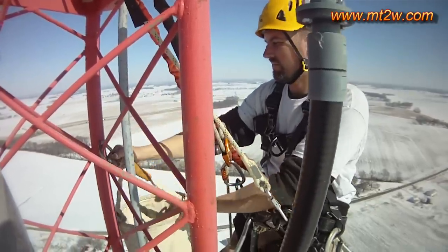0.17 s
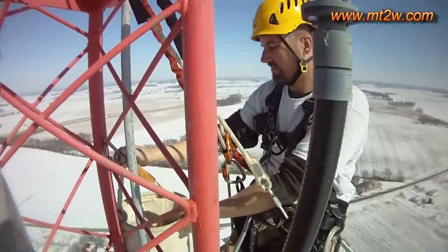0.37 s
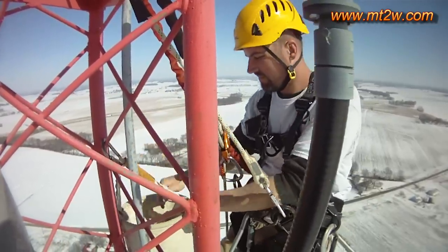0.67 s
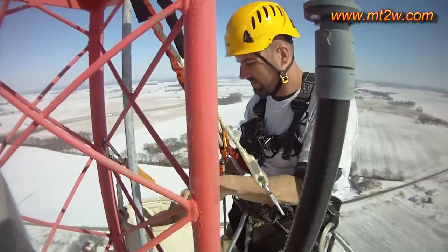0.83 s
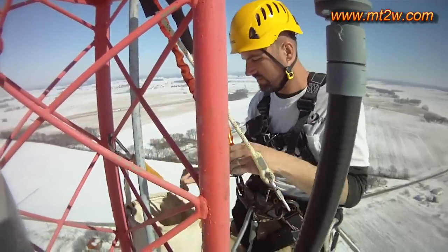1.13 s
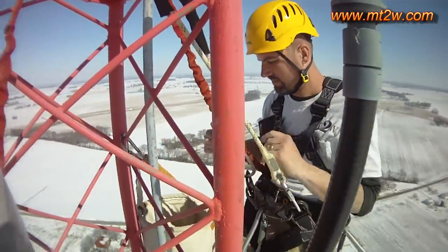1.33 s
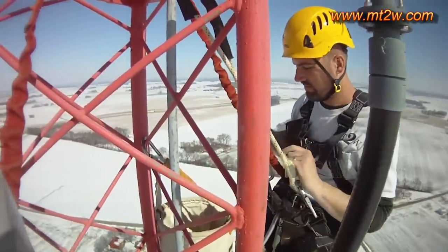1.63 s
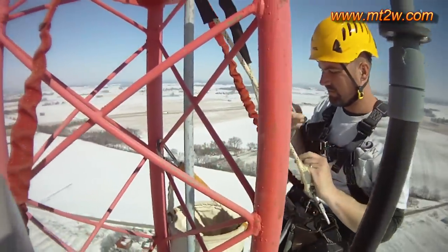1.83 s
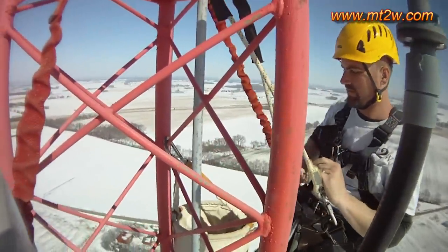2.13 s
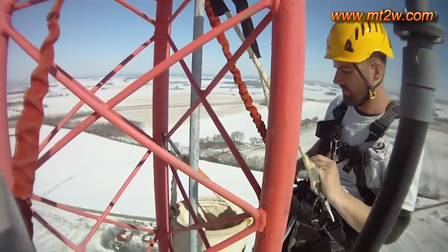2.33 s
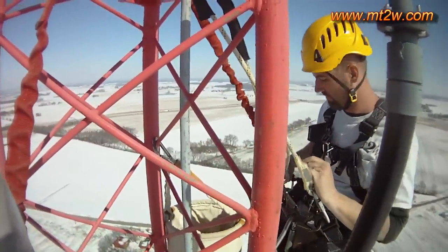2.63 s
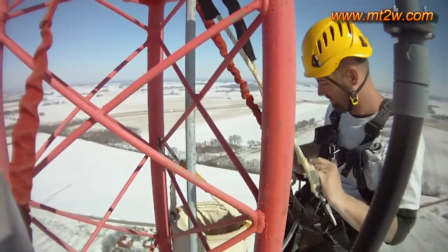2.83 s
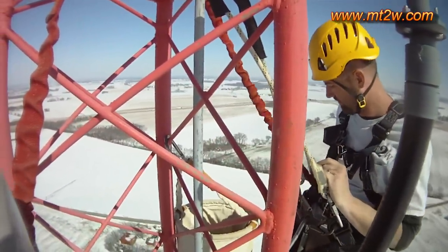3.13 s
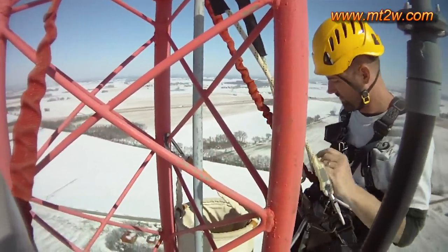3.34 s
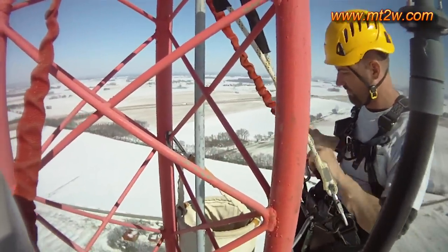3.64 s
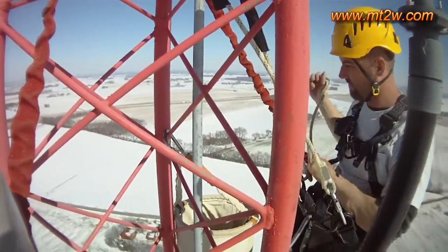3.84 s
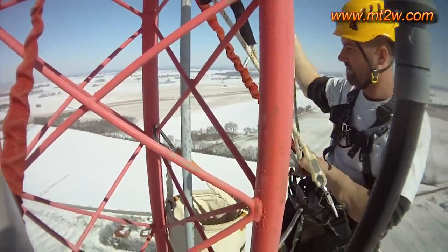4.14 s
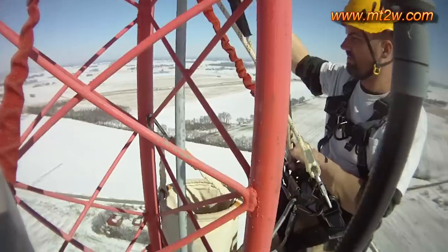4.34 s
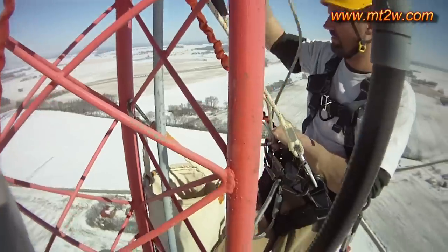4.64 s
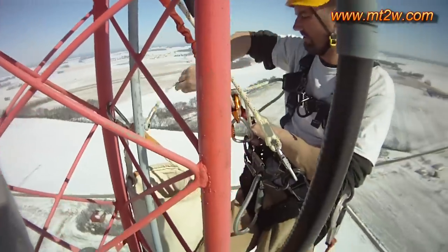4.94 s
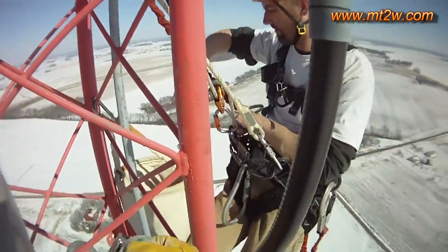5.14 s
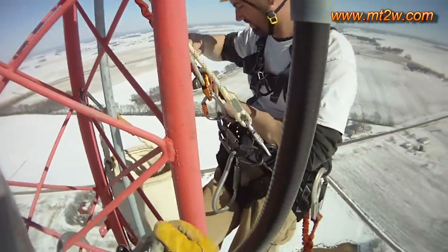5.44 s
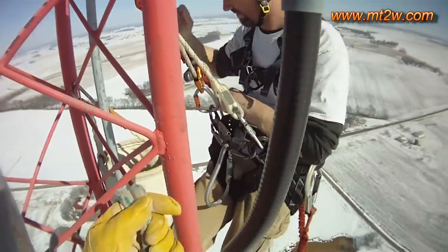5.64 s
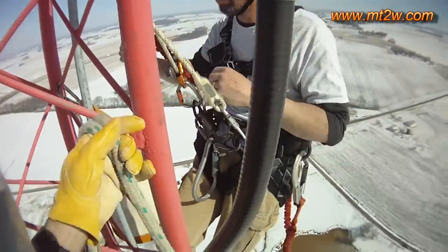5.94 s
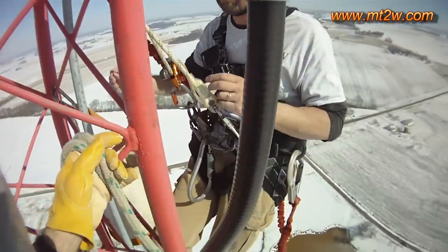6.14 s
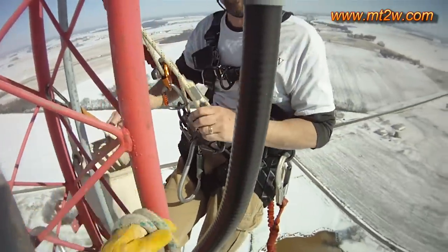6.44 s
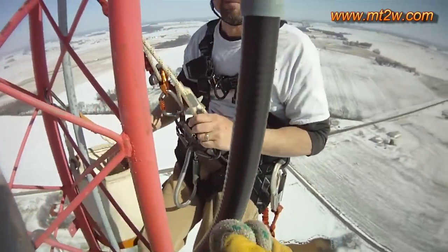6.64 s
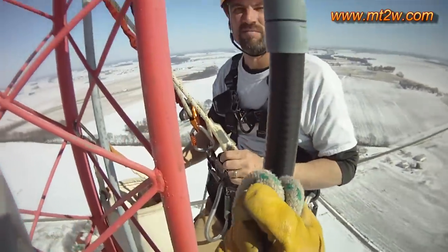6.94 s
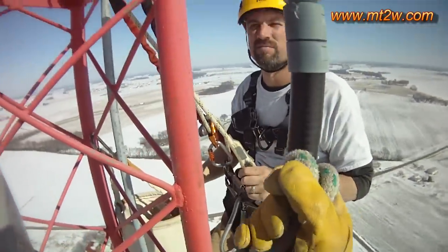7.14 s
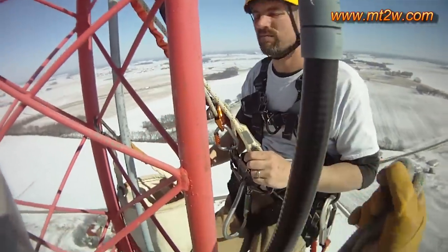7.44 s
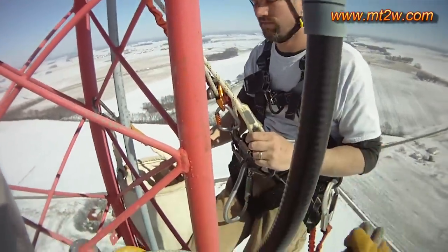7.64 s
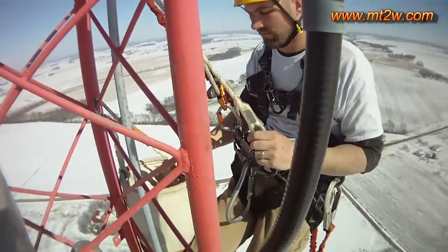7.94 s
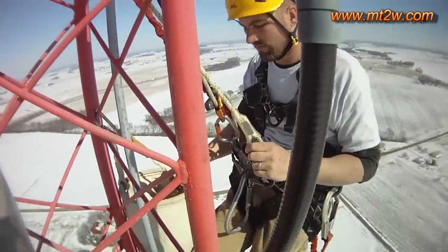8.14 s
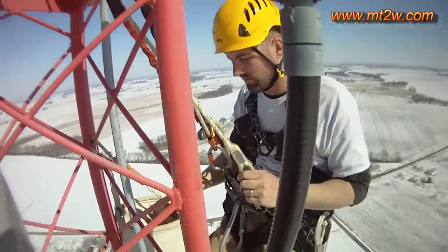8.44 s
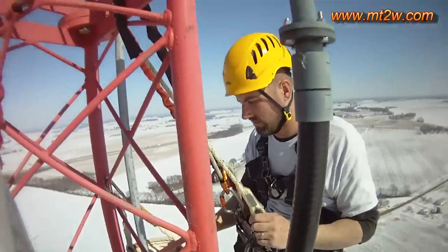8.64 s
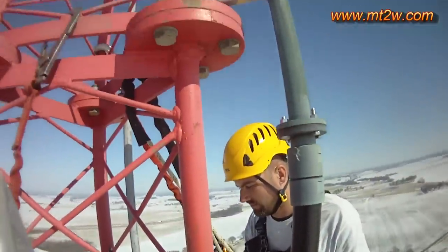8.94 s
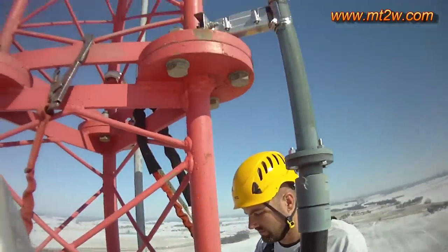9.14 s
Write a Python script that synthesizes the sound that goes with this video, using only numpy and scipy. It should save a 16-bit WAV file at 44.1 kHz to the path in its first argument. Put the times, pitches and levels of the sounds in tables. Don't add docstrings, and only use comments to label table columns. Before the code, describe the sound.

Outdoors on a high steel lattice mast, a helmet microphone in a closed housing gives boxy, coloured metal sounds. A low wind hum and thin hiss run throughout, with faint treble ticking bursts from the electronics, stronger on the right. An earlier blow is still ringing at the start; a bright clink lands at 0.15 s. Webbing creaks around 0.9-1.4 s, a soft knock comes at 2.2 s, small ticks near 2.9 s. A hard hook strike rings at 3.57-3.8 s, with a weak rebound at 4.17 s. Webbing creaks at 4.6 and 4.95 s, a carabiner knocks at 5.05 and 5.45 s. From 5.6 to 5.85 s a bunch jangles densely as rope rubs. Ticks, a knock at 6.24 s, dull bumps and a gust follow, then a shackle knocks at 6.82 s and a gate snaps at 7.58 s. A faint, wavering wire whistle colours the calmer ending, with a late puff near 8.9 s.

```python
import sys
import numpy as np
from scipy import signal
from scipy.fft import rfft, irfft
from scipy.io import wavfile
from scipy.ndimage import uniform_filter1d

SR = 44100
rng = np.random.default_rng(int(sys.argv[2]) if len(sys.argv) > 2 else 0)


def master(y):
    cut = np.clip(np.atleast_2d(y).T, -1, 1)
    pcm = np.round(cut * 32767)
    wavfile.write(sys.argv[1], SR, pcm.astype(np.int16))


def level_to_linear(level):
    exponent = np.asarray(level, float) / 20
    return 10 ** exponent


N = 409688
T = np.arange(N) / SR

# start_s, middle_cavity_peak_db, low_cavity_db, high_cavity_db, ring_db
EARLIER_BLOW = [
    (0, -28, 0, -20, -6),
]
RUNG_BLOWS = [
    (0.0298, -40, -20, -16, -18),
    (0.1231, -44.5, 6, -18, -1),
    (0.1392, -40, -11, -9, 9.5),
    (0.1525, -36.5, 1, 13, -25),
    (0.1538, -21.5, -16, -1, -3.5),
]
HOOK_BLOWS = [
    (3.5717, -8, -5.5, -9.5, -15.5),
    (3.5835, -23, -4, -8, -12),
]
REBOUND_BLOWS = [
    (4.166, -33, 1, -22, -10),
    (4.2268, -41, -7, -14, -37),
]
CARABINER_BLOWS = [
    (5.0240, -38, 11, -7, -17),
    (5.051, -22.5, -0.5, -7.5, -11),
    (5.454, -31, 1.5, 0.5, -16),
]
SOFT_BLOWS = [
    (2.227, -30.5, -6.5, -13, -13),
    (2.932, -41.5, 6, -7, -3),
    (6.0699, -36, -6, -15, -13),
    (6.2397, -19.5, -4, -2, -28),
]
BUNCH_BLOWS = [(5.5878, -25, -6, -7, -3.5), (5.5915, -16.5, -5, 1.5, -17), (5.5985, -24, -4, 1, -8),
               (5.604, -30, -3, -9, -11), (5.6167, -21.5, -3, -4, -3.5), (5.6352, -15, -2.5, -1, -22),
               (5.6400, -13.5, -11, -14, -4), (5.6444, -19, 1, 1.5, -10), (5.656, -42, -4, -9, -8),
               (5.6816, -37.5, 10.5, -4, -19), (5.7372, -32, -11, -8, -24), (5.7404, -23, -18, -20, -1.5),
               (5.7664, -13, -7, -4.5, -6), (5.7715, -27, -16, 2, -1), (5.7994, -26, -22, -21, -11),
               (5.8384, -27, -20, -17, 0)]
GATE_BLOWS = [
    (7.5213, -45, -11, 1, -19),
    (7.5799, -20.5, -8, 11, -6.5),
]
SHACKLE_BLOWS = [
    (6.8174, -29, -14, -30, -4),
    (6.8234, -20.5, -5.5, -11.5, -23),
    (6.8284, -21.5, -6, -9, -16),
]

# start_s, peak_db, low_cavity_db, high_cavity_db,
# pitch_hz
TICKS = [(.061, -58, -6, 7, 6100), (0.501, -51.5, 5, 0, 2400), (2.34, -61, -8, 6, 5600),
         (8.778, -58, 3, -6, 2400), (.535, -57, 2, 6, 2400), (2.2122, -47.5, 4, -14, 2600),
         (2.803, -59, 9, -10, 2500), (2.9187, -34, -7, -24, 2660), (3.5359, -37, 3, -20, 2750),
         (3.553, -48, 20, -8, 3900), (3.6800, -27, -7, -4.5, 2660), (3.772, -49, 11, -14, 2610),
         (3.7808, -21.5, -5, -7, 2960), (4.1014, -53, 8.5, -12, 2770), (4.9492, -52, 14.5, -10, 2540),
         (5.036, -52, 10, -12, 2330), (5.26, -54, 18.5, -16, 2960), (7.19, -34, -4.5, -6, 4050),
         (6.905, -48.5, 5, 1, 2500), (9.2758, -46, 3, 1, 2740),
         (5.6115, -20.5, -6, -11, 2480), (5.9579, -37.5, -21, -14, 3720), (5.993, -43, 3.5, -10, 3950),
              (6.196, -24.5, -13, -15, 3640), (6.2202, -29, -2, -4, 2340), (6.254, -39, -2, -6, 2640),
              (6.311, -44, -2, -7, 4090), (6.4037, -45, -1, -12, 2320), (6.4332, -43.5, 4, -8, 2400),
              (6.4898, -44, 3, 2, 7350), (6.544, -45, 3.5, -6, 2400), (6.577, -29, 1.5, 3, 3650),
              (6.6142, -28.5, 0.5, 3, 3640), (6.67, -26.5, 5, 3, 3650), (6.6827, -30.5, -10, -10, 3300),
              (6.735, -44, -10, -5, 4080), (6.8812, -37, 5.5, -2, 2480), (6.888, -41.5, 4, -1, 2390)]
BLOW_NOTES = [(.1535, -17, 0, 0, 6850), (.1535, -30, 0, 0, 8700), (3.811, -33, 0, 0, 3050),
              (3.766, -38, 0, 0, 2000), (2.2274, -28, 0, 0, 3580), (2.9188, -39, 0, 0, 3900),
              (3.773, -32, 0, 0, 2470), (3.7812, -16, 0, 0, 2620), (4.165, -32, 0, 0, 3600),
              (5.454, -25, 0, 0, 2570), (5.5915, -13, 0, 0, 2450), (5.6816, -37, 0, 0, 7700),
              (5.7664, -14, 0, 0, 3950)]
LINGERING_NOTES = [(0, -49, 0, 0, 2961), (0, -55, 0, 0, 2985), (.154, -50, 0, 0, 4283),
                   (.154, -51, 0, 0, 3770), (.154, -53, 0, 0, 2961), (3.7801, -52, 0, 0, 2958),
                   (3.7801, -57, 0, 0, 3023), (3.7801, -52, 0, 0, 4283), (4.165, -55, 0, 0, 4283),
                   (4.165, -60, 0, 0, 2907), (5.77, -51, 0, 0, 2019), (7.58, -59, 0, 0, 2963),
                   (7.58, -61, 0, 0, 4382)]

# pitch_hz, level_db, t60_s
RUNG_MODES = [(1981, -21, 0.75), (1930, -22, .3), (2040, -24, .3), (3927, -9, .25), (4314, -23, .4),
              (2326, -22, 0.4), (2762, -12, 0.2), (2961, -19, 0.6), (3192, -15, 0.3), (3408, -23, 0.53),
              (3564, -17, 0.25), (3623, -23, 0.4), (3772, -8, 0.25), (3815, -19, 0.65), (4199, -17, 0.4),
              (5378, -22, 0.4), (5787, -23, 0.25), (5986, -33, 0.68), (6347, -24, 0.36), (6471, -12, 0.4),
              (7655, -19, 0.31), (8145, -33, 0.4), (9071, 0, 0.092), (9356, -18, 0.25), (9518, -34, 0.38),
              (11110, -27, 0.21)]
HOOK_MODES = [(1986, -27, 0.49), (2067, -34, 0.42), (2293, -22, 0.66), (2600, -31, 2.7), (2955, -18, 0.55),
              (3391, -19, 0.56), (3623, -8, 0.34), (3774, -12, 0.43), (3854, -17, 0.35), (4037, -3, 0.15),
              (4091, -14, 0.49), (4215, -11, 0.63), (4280, -4, 0.41), (4511, -15, 0.34), (4818, -25, 0.64),
              (5582, -23, 0.25), (6115, -28, 0.54), (6218, -15, 0.33), (6363, -20, 0.52), (6589, -4, 0.14),
              (6735, -22, 0.55), (6837, -23, 0.42), (7058, -28, 0.66), (8053, -15, 0.12), (8818, -28, 0.22),
              (8958, -23, 0.22), (10210, -32, 0.25), (7700, -26, .25), (8250, -24, .25)]
REBOUND_MODES = [(2379, -13, .3), (2907, -17, .6), (3618, -9, .3), (3924, -4, .15), (4011, -16, .3),
                 (4280, -12, .7), (4409, -2, .16), (4834, -14, .3)]
CARABINER_MODES = [(2067, -20, 0.45), (2374, -19, 0.45), (3036, -17, .5), (3381, -5, 0.26),
                   (3601, -10, 0.36), (3758, -12, .2), (3655, -17, .5), (3930, -6, 0.26), (4802, -23, 0.25),
                   (5276, -30, 0.3), (5572, -19, 0.2), (6315, -24, 0.4), (6638, -17, 0.36),
                   (7058, -22, 0.26), (2476, -17, .2), (7660, -22, 0.3)]
SOFT_MODES = [(2430, -17, 0.17), (3080, -11.5, 0.4), (3400, -21, 0.36), (3560, -7, 0.21), (3730, -14, 0.28),
              (4050, -10.5, 0.18), (4270, -11.5, 0.54), (6300, -15, .25)]
BUNCH_MODES = [(738, -34, 0.3), (2016, -30, 0.22), (2382, -8, 0.07), (2519, -28, 0.35), (2722, -25, 0.2),
               (2955, -31, .45), (3110, -30, 0.36), (3397, -26, 0.28), (3601, -11, 0.12), (3731, -19, .18),
               (3900, -22, .25), (4180, -24, .2), (4264, -30, 0.4), (4807, -42, .4), (6218, -36, .4),
               (5572, -34, 0.33), (6632, -27, 0.33),
               (734, -18.5, 0.33)]
GATE_MODES = [(4081, -24, .45), (4100, 6, .04), (3950, -12, .18), (2960, -5, .05), (6900, 15, .014),
              (8060, 21, .013), (4540, 5, .014), (7420, 12, .018), (7655, -24, .18), (5930, 12, .018),
              (9950, 3, .03), (11860, 15, .018), (2590, 0, .035), (2230, 14, .018), (2830, 0, .04),
              (4764, -36, .8)]
SHACKLE_MODES = [(7000, -0.38, 0.094), (2480, -1.5, 0.053)]
# pitch_hz, level_db, t60_s
LATTICE_MODES = [(4283, -17, 1.2), (2958, -23, 1.1), (4190, -16, 1.0), (935, -22, .3), (1545, -30, .3)]

# centre_hz, width_hz, level_db
LOW = [(2047, 790, -5.5), (2448, 460, -4), (2980, 800, -3.5), (596, 450, -15)]
MIDDLE = [(3650, 1000, -13), (4016, 765, 5), (4015, 1270, 3)]
HIGH = [(5630, 2230, -7), (6850, 570, -2.5), (7750, 450, -5.5)]
TOP = [(9030, 370, -3), (10300, 2200, -2.5), (11180, 2100, 1), (14200, 2200, -9)]
# centre_hz, width_hz, level_db
CREAK_CAVITIES = [(2490, 450, 0), (2920, 540, -6)]
WHINE_BAND = [(8820, 400, 0)]

# middle_s, half_length_s, above_rustle_db
PULLS = [
    (0.02, 0.78, 10.5),
    (4.55, 0.25, 9.5),
    (5.0, 0.26, 12),
    (5.7, 0.59, 26),
    (6.3, 0.15, 14.5),
    (6.7, 0.32, 14),
    (7.85, 0.92, -1.5),
]
# middle_s, half_length_s, level_db
CREAKS = [
    (.885, 0.044, 20),
    (.955, .04, 14),
    (1.1, .07, 15),
    (1.2, .03, 5),
    (1.36, .03, 9),
    (2.8, .12, 3),
    (4.57, 0.25, 11),
    (4.95, 0.069, 25),
    (5.42, .1, 10),
    (8.72, .03, 9),
]
# middle_s, peak_db, pitch_hz
BUMPS = [
    (6.215, -51, 65),
    (6.51, -51, 60),
    (6.607, -52, 92),
    (6.708, -51, 55),
    (6.73, -50, 126),
    (6.98, -53, 55),
    (7.32, -60, 60),
]

# time_s, shelter_0_to_1
SHELTER = [
    (0, 0.77),
    (1.4, 0.15),
    (1.7, 0.05),
    (3.6, 0.95),
    (4.7, 0.4),
    (5.7, 0.96),
    (6.3, 0.9),
    (7.7, 0.4),
    (9.29, 0.5),
]
# middle_s, half_length_s, level_db
PUFFS = [
    (5.95, 0.091, 14),
    (6.21, 0.048, 16),
    (6.65, 0.5, 19),
    (.6, 1, 8),
    (7.06, .12, 12),
    (7.35, 0.089, 7),
    (8.57, 0.11, 7),
    (8.92, 0.2, 14),
]
# middle_s, half_length_s, above_faintest_db
WHISTLE = [
    (5.4, 0.18, 26),
    (6.6, 0.99, 18.5),
    (7.42, 0.16, 18.5),
    (8.45, 0.71, 21.5),
]

# pitch_hz, density_db_per_hz
HUM = [(53, -30), (90, -17.5), (296, -13), (323, -13.5), (348, -12.5), (380, -10.5), (508, -7.5),
       (554, -2.5), (694, -8), (1440, -34), (1800, -30), (2340, -33.5), (3960, -120)]
AIR = [(1200, 9), (2000, 1), (2600, 5), (4200, 0), (5700, -0.5), (7800, 0), (8800, -2), (10000, -1.5),
       (12000, -0.5), (15500, -2.5)]
BUFFET = [(12, -30), (25, -4), (50, 0), (80, -1), (130, -4), (250, -20), (600, -60)]
LOW_DRONE = [(60, -40), (72, 5), (78, -3), (85, -6), (100, -55)]
HISS = [(500, -57), (900, -19.5), (2600, -10.5), (4400, -9.0), (9000, -8.5), (15500, -8.5)]
CARD_BURST = [(5000, -50), (8000, -2.0), (10300, 7), (10900, 6.0), (11700, 15.5), (12200, 3), (13800, 13),
              (14600, -15), (15500, -18)]

# first_s, last_s
WRITE_RUNS = [(.295, .7), (1.1, 1.2), (2.8, 3.1), (3.5, 3.5), (4, 4.2), (5.1, 5.1), (6.7, 7.1), (7.5, 7.5),
              (8, 8.2), (8.4, 8.5), (9.1, 9.1)]
LONG_WRITES = [.095, .891, 3.299, 3.8, 4.392, 4.597, 4.893, 7.307, 7.797, 8.607, 8.91]

RUSTLE_DB = -63.5
HUM_DB, HUM_RISE_DB, BUFFET_DB, BUFFET_FALL_DB = -47.5, 2.5, -55, 16
WHISTLE_DB, WHISTLE_FROM_S, WHISTLE_HZ, SAG_HZ_PER_S = -61.5, 5.2, 567, 3.5
WRITE_PERIOD_S = 0.1
BUMP_S = 0.015
LOW_CUT_HZ = 1970


def gear():
    frame = [(hz, db - 9, 0.9) for hz, db, _ in LATTICE_MODES[:2]]
    rung = ring(EARLIER_BLOW, RUNG_MODES[:15] + frame, wash_db=-35, wash_t60=0.4,
                low_db=-3, high_db=-20, lag_s=0.11, split_hz=22, twin_db=-6)
    rung = rung + ring(RUNG_BLOWS, RUNG_MODES + LATTICE_MODES[3:] + frame, wash_db=-9.5, wash_t60=0.44,
                       low_db=-10, high_db=-9, lag_s=0.025, split_hz=27, twin_db=-4)
    hook = ring(HOOK_BLOWS, HOOK_MODES + LATTICE_MODES[:3], wash_db=-7, wash_t60=0.67,
                low_db=-8, high_db=-15, lag_s=0.0019, split_hz=70, twin_db=-4)
    hook = hook + ring(REBOUND_BLOWS, REBOUND_MODES, wash_db=-7, wash_t60=0.34,
                       low_db=-6, high_db=-16, lag_s=0.005, split_hz=46, twin_db=-4)
    carabiners = ring(CARABINER_BLOWS, CARABINER_MODES, wash_db=-9.5, wash_t60=0.4,
                      low_db=-7, high_db=-10, lag_s=0.003, split_hz=70, twin_db=-5)
    carabiners = carabiners + ring(SOFT_BLOWS, SOFT_MODES, wash_db=-7, wash_t60=0.64,
                                   low_db=-10, high_db=-17, lag_s=0.0035, split_hz=88, twin_db=-4)
    bunch = ring(BUNCH_BLOWS, BUNCH_MODES, wash_db=-11.5, wash_t60=0.25,
                 low_db=-7.5, high_db=-21, lag_s=0.0074, split_hz=34, twin_db=-6)
    gate = cut_lows(ring(GATE_BLOWS, GATE_MODES, wash_db=-18, wash_t60=0.33,
                     low_db=-6, high_db=-7, lag_s=0.00059, split_hz=30, twin_db=-11))
    shackle = ring(SHACKLE_BLOWS, SHACKLE_MODES, wash_db=-7, wash_t60=0.067,
                   low_db=-14, high_db=-8, lag_s=0.001, split_hz=35, twin_db=-4)
    ringing = rung + hook + carabiners + bunch + gate + shackle

    contacts = chatter(RUNG_BLOWS, t60=0.07, top_db=-7)
    contacts = contacts + chatter(HOOK_BLOWS + REBOUND_BLOWS, t60=0.066, top_db=-14)
    contacts = contacts + chatter(CARABINER_BLOWS + SOFT_BLOWS, t60=0.078, top_db=-17)
    contacts = contacts + chatter(BUNCH_BLOWS, t60=0.053, top_db=-14)
    contacts = contacts + chatter(GATE_BLOWS, t60=0.0074, top_db=-9, first_db=5)
    contacts = contacts + chatter(SHACKLE_BLOWS, t60=0.053, top_db=-10)

    all_ticks = TICKS
    ticks = chatter(all_ticks, t60=0.048, top_db=-18.5, crack_db=-8) + pings(all_ticks)
    blow_notes = cut_lows(pings(BLOW_NOTES, ping_db=-3, t60=0.029))
    return ringing + contacts + ticks + blow_notes + lingering()


def ring(blows, modes, wash_db, wash_t60, low_db, high_db, lag_s, split_hz, twin_db):
    blows = np.array(blows)
    chance = rng.standard_normal((len(blows), 2, len(modes), 3))
    strength = blows[:, 1] + blows[:, 4]
    main = blows[:, 1].argmax()
    scatter_db = np.where(np.arange(len(blows)) == main, 0.5, 3.5)
    kick_db = strength[:, None, None] + scatter_db[:, None, None] * chance[:, 0]
    kick = level_to_linear(kick_db) * np.exp(3j * chance[:, 1])
    dull = level_to_linear(np.minimum(blows[:, 3] - blows[main, 3], 0))
    at = (blows[:, 0] * SR).astype(int)
    start, end = at.min(), min(N, at.max() + SR)

    out = np.zeros(N)
    detune = rng.standard_normal(len(modes))
    detune = np.sign(detune) * (0.5 + 0.6 * abs(detune))
    swing = level_to_linear(3 * walk(45)) * np.exp(0.7j * walk(35))
    for k, (hz, db, t60) in enumerate(modes):
        t60 = t60 if t60 < 1.45 else 0.35
        db = db - 60 * lag_s / t60
        mode_swing = np.roll(swing, 3001 * k)[start:end]
        for twin, side in enumerate((0, 1, -1.7)):
            x = np.zeros(end - start, complex)
            x[at - start] = level_to_linear(db + twin * twin_db) * kick[:, k, twin] * (dull if hz > 5000 else 1)
            twin_hz = hz + side * split_hz * detune[k]
            pole = np.exp(2j * np.pi * twin_hz / SR - np.log(1000) / (t60 * SR))
            out[start:end] += (signal.lfilter([1], [1, -pole], x) * mode_swing).imag

    energy = np.zeros(N)
    energy[at] = level_to_linear(2 * (strength + wash_db))
    dying = signal.lfilter([1], [1, -level_to_linear(-2 * 60 / (wash_t60 * SR))], energy)
    wash = np.sqrt(dying) * rng.standard_normal(N)
    low, high = cavities(wash, LOW), cavities(wash, HIGH + TOP[:1])
    return out + level_to_linear(low_db) * low + cavities(wash, MIDDLE) + level_to_linear(high_db) * high


def chatter(blows, t60, top_db, crack_db=-7, first_db=9):
    drive = np.zeros((4, N))
    t = np.arange(SR // 5) / SR
    for s, db, low_db, high_db, _ in blows:
        spikes_db = 3 * np.repeat(rng.standard_normal(len(t) // 20), 20)
        grains = rng.standard_normal(len(t)) * level_to_linear(spikes_db)
        touch = np.sign(grains) * level_to_linear(first_db - 60 * t / 0.006)
        flurry = touch + grains * level_to_linear(-60 * t / t60)
        i = int(s * SR)
        gains = level_to_linear(db + crack_db + np.array([low_db, 0, high_db, high_db + top_db]))
        drive[:, i:i + len(t)] += (gains[:, None] * flurry)[:, :N - i]
    groups = (LOW[:3], MIDDLE, HIGH, TOP)
    thinned = cut_lows(sum(cavities(d, g) for d, g in zip(drive, groups)))
    return thinned + cavities(drive[0], LOW[3:])


def pings(ticks, ping_db=-5, t60=0.038):
    out, t = np.zeros(N), np.arange(SR) / SR
    for s, db, low_db, high_db, hz in ticks:
        i = int(s * SR)
        envelope = level_to_linear(db + max(low_db, 0, high_db) + ping_db - 60 * t / t60)
        note = envelope * np.sin(2 * np.pi * hz * t)
        out[i:i + len(t)] += note[:N - i]
    return out


def lingering():
    return pings(LINGERING_NOTES, ping_db=-4, t60=1.3) * level_to_linear(3 * walk(30))


def cavities(x, group):
    out = 0
    for k, (hz, width, db) in enumerate(group):
        b, a = signal.iirpeak(hz, hz / width, fs=SR)
        resonance = signal.lfilter(b, a, signal.lfilter(b, a, x))
        out = out + (-1) ** k * level_to_linear(db) * np.sqrt(SR / width / 3) * resonance
    return out


def cut_lows(x):
    return signal.sosfilt(signal.butter(4, LOW_CUT_HZ, "high", fs=SR, output="sos"), x)


def rubbing():
    grains = rng.standard_normal(N) * level_to_linear(2 * walk(120))
    sound = cavities(grains, LOW[:3]) + level_to_linear(0.5) * cavities(grains, MIDDLE)
    sound = sound + level_to_linear(-12.5) * cavities(grains, HIGH)
    return level(sound, -4.5) * level_to_linear(RUSTLE_DB + swells(PULLS))


def creaks():
    steps = rng.standard_normal(N) * level_to_linear(5.4 * walk(150))
    return level(cavities(steps, CREAK_CAVITIES), -76) * level_to_linear(swells(CREAKS))


def bumps():
    out = np.zeros(N)
    for s, db, hz in BUMPS:
        out += level_to_linear(db) * np.exp(-((T - s) / BUMP_S) ** 2) * np.sin(2 * np.pi * hz * (T - s))
    return out


def wind():
    shelter = curve(SHELTER)[0]
    hum_db = HUM_DB + HUM_RISE_DB * shelter
    hum = coloured(HUM) * level_to_linear(hum_db + 0.9 * walk(8.3))

    buffet_db = BUFFET_DB - BUFFET_FALL_DB * shelter + swells(PUFFS)
    buffet = coloured(BUFFET) * level_to_linear(buffet_db + 2.2 * walk(7) - 7.5)
    drone = level_to_linear(-73.5) * coloured(LOW_DRONE)

    hz = WHISTLE_HZ - SAG_HZ_PER_S * (T - WHISTLE_FROM_S)
    phase = 2 * np.pi * np.cumsum(hz + 3.283 * walk(22)) / SR
    onset = np.clip((T - WHISTLE_FROM_S) / 0.28, 0, 1)
    whistle_db = WHISTLE_DB + swells(WHISTLE) + 2.9 * walk(26) - 7
    whistle = onset * level_to_linear(whistle_db) * np.sqrt(2) * np.sin(phase)
    return hum + buffet + drone + whistle


def air():
    return level_to_linear(-59) * coloured([(600, -39)] + AIR)


def electronics():
    hiss = np.array([coloured(HISS) for _ in range(2)]) * level_to_linear(-62)
    writing = np.zeros(N)
    for first, last in WRITE_RUNS:
        for s in np.arange(first, last + WRITE_PERIOD_S / 2, WRITE_PERIOD_S):
            writing += (T > s) & (T < s + 0.027)
    for s in LONG_WRITES:
        writing += (T > s) & (T < s + 0.067)
    leak_gain = level_to_linear(np.array([[-68.0], [-59.0]]))
    leak = uniform_filter1d(writing, size=150) * coloured(CARD_BURST) * leak_gain
    clock = level_to_linear(-75) * np.sin(2 * np.pi * 11995 * T + 0.7 * walk(20))
    clock = clock + level_to_linear(-80) * np.sin(2 * np.pi * 7780 * T + 1.5 * walk(30))
    whine = level(cavities(rng.standard_normal(N), WHINE_BAND), -76)
    return hiss + leak + clock + whine


def level(x, db):
    return x * level_to_linear(db) / np.sqrt(np.mean(x ** 2))


def curve(table):
    s, *columns = np.transpose(table)
    return [np.interp(T, s, c) for c in columns]


def swells(table):
    return sum(db * np.clip(1 - abs(T - s) / half_s, 0, 1) for s, half_s, db in table)


def walk(rate):
    k = int(SR / rate)
    held = np.repeat(rng.standard_normal(N // k + 1), k)
    return 1.4 * uniform_filter1d(uniform_filter1d(held, k), k)[:N]


def coloured(spectrum):
    hz, db = np.transpose(spectrum)
    f = np.maximum(np.arange(N // 2 + 1) * SR / N, 1)
    gain = level_to_linear(np.interp(np.log(f), np.log(hz), db))
    return level(irfft(rfft(rng.standard_normal(N)) * gain, N), 0)


def scene():
    mic = gear() + rubbing() + creaks() + bumps() + wind() + air()
    return mic + electronics()


def low_pass(x):
    return signal.sosfilt(signal.butter(12, 16540, fs=SR, output="sos"), x)


def record(dry):
    spectrum, hz = rfft(dry), np.arange(N // 2 + 1) * SR / N
    body = irfft(spectrum * (hz < 15330), N)
    top = irfft(spectrum * (hz >= 15330) * np.clip((16500 - hz) / 900, 0, 1), N)
    loud = uniform_filter1d(np.mean(top ** 2, axis=0), size=600) > level_to_linear(2 * -69)
    top_gate = uniform_filter1d(loud * 1.0, size=200)
    mix = body + top * top_gate
    return low_pass(mix)


dry = scene()
out = record(dry)
master(out)
```